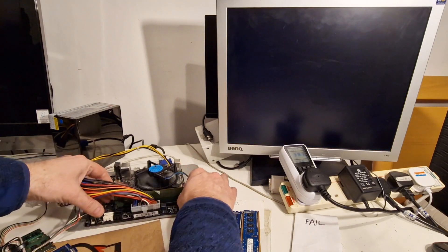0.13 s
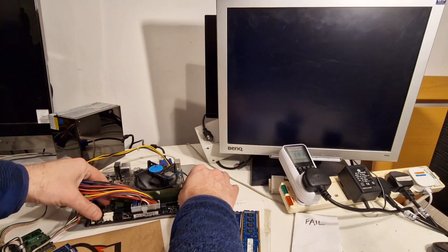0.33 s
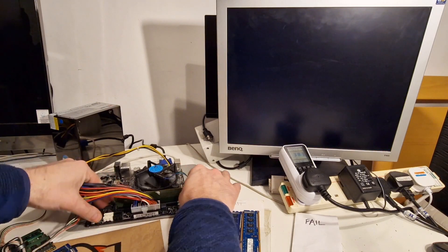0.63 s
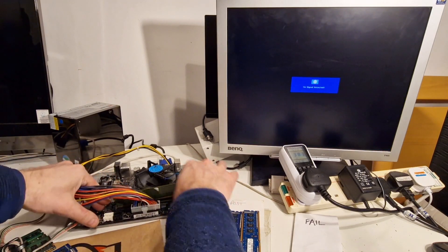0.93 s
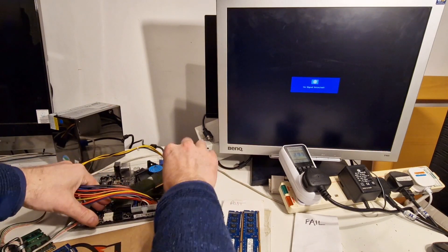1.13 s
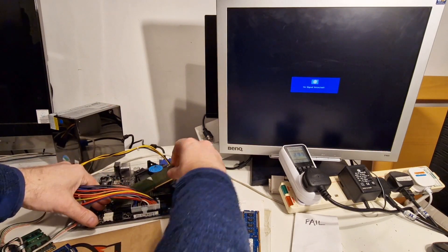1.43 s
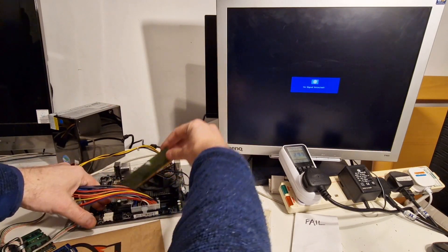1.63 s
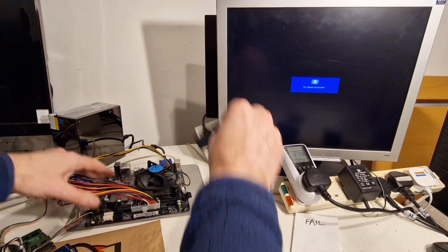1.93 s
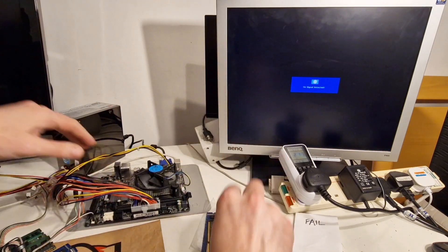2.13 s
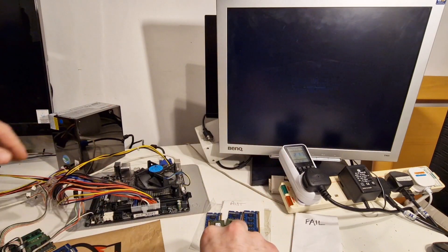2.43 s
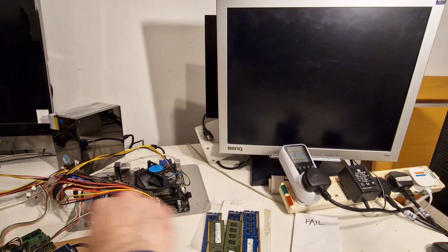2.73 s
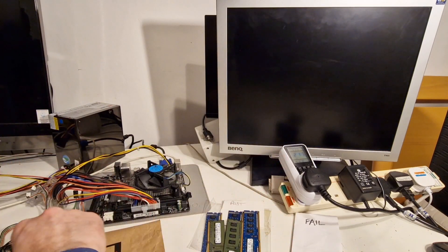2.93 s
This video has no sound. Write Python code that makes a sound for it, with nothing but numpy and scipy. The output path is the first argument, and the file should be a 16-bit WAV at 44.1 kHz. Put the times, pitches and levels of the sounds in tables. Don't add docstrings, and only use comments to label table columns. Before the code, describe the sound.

Sharp plastic snaps and soft knocks as a memory stick is unlatched and dropped on a pile

```python
import sys
import numpy as np
from scipy import signal
from scipy.fft import rfft, irfft
from scipy.io import wavfile

SR = 44100
rng = np.random.default_rng(int(sys.argv[2]) if len(sys.argv) > 2 else 0)


def volts_from_decibels(level):
    exponent = np.asarray(level, float) / 20
    return 10 ** exponent


def master(y):
    cut = np.clip(np.atleast_2d(y).T, -1, 1)
    pcm = np.round(cut * 32767)
    wavfile.write(sys.argv[1], SR, pcm.astype(np.int16))


N = 136710

# (pitch [Hz], level [dB], time to fade by 60 dB [s])
BOARD_TONES = [(273.3, 0.5, 0.082), (356.8, -3, 0.055), (437, 0.5, 0.044), (434, -10, 0.062),
               (662, -26.5, 0.095)]
# (pitch [Hz], level [dB], time to fade by 60 dB [s])
DESK_TONES = [(70, -1.5, 0.054), (125.2, 12.5, 0.081), (145.2, -0.5, 0.23), (176, -12.5, 0.29)]
STICK_T60_S = 0.0018


def ring(force, hz, t60):
    r = volts_from_decibels(-60 / (t60 * SR))
    w = 2 * np.pi * hz / SR
    return signal.lfilter([0, np.sin(w)], [1, -2 * r * np.cos(w), r * r], force + 1e-18)


def strike(force, tones):
    vary_db, detune = 1.5, 0.02
    out = 0
    for k, (hz, db, t60) in enumerate(tones):
        a, b = rng.standard_normal(2)
        sign = (-1) ** k
        out = out + sign * volts_from_decibels(db + vary_db * a) * ring(force, hz * (1 + detune * b), t60)
    return out


def add(out, x, s):
    i = int(s * SR)
    out[i:i + len(x)] += x[:N - i]


def rms_one(x):
    return x / np.sqrt(np.mean(x ** 2) + 1e-20)


def in_time(rows):
    return volts_from_decibels(np.interp(np.arange(N) / SR, *np.transpose(rows)))


def at_hz(points, hz):
    x, y = np.transpose(points)
    return np.interp(np.log(hz), np.log(x), y)


def drift(rate):
    r = np.exp(-80 * np.pi * rate / SR)
    steps = rng.standard_normal(N // 40 + 2002)
    slow = signal.lfilter([1], [1, -2 * r, r * r], steps)[2000:]
    return np.interp(np.arange(N) / 40, np.arange(len(slow)), rms_one(slow))


def knocks():
    # (time [s], board peak [dB], desk thump against board [dB], plastic against board [dB])
    bumps = [(0.152, -42.5, -26, -28), (0.183, -48, -41, -38), (0.237, -47, -25, -31),
             (0.248, -69, 10, -33), (0.346, -43, -37, -21), (0.418, -49, -12.5, -43), (0.655, -37, -7, -30),
             (0.673, -20, -12.5, -9), (0.708, -15.5, -3.5, -9), (0.774, -17.5, -31, -3),
             (0.782, -34.5, -25, 15), (0.789, -33, -11.5, -32), (0.917, -42.5, -9.5, -9),
             (1.022, -50, -48, -4.5), (1.088, -43, -32, 7.5), (1.113, -39, -30, 7.5),
             (1.127, -35, -23, -16), (1.137, -36.5, -27.5, -22), (1.341, -40, -28, -4.5),
             (1.349, -42.5, -42, -41), (1.416, -45.5, -21, -35), (1.462, -54.5, -4.5, 3.5),
             (1.56, -38, -29, 3), (1.637, -46.5, -22, 12.5), (1.919, -50, -18.5, -13),
             (2.198, -46, -6, 7.5), (2.582, -31.5, -9.5, 0.5), (2.589, -26.5, -11, -23),
             (2.629, -36.5, -9.5, -7.5)]
    # (pitch [Hz], level [dB], time to fade by 60 dB [s])
    plastic_tones = [(543, -11, 0.091), (820, -13, 0.011), (1090, -4.5, 0.015), (1290, 2.5, 0.0075),
                     (1328, -2, 0.029), (1630, -3.5, 0.017), (754, -9, 0.022), (1960, 1, .01)]
    contact_hz = 860
    bump_delay_s = 0.002016
    out = np.zeros(N)
    t = np.arange(SR // 3) / SR
    push = t * np.exp(-2 * np.pi * contact_hz * t)
    push = push / push.sum()
    for s, db, desk_db, plastic_db in bumps:
        board = strike(push, BOARD_TONES)
        desk = volts_from_decibels(desk_db) * strike(push, DESK_TONES)
        plastic = volts_from_decibels(plastic_db + 4.5) * strike(push, plastic_tones)
        add(out, volts_from_decibels(db - 3) * (board + desk + plastic), s + bump_delay_s)
    return out


def thin(humps):
    return [(hz, db, STICK_T60_S) for hz, db in humps]


def blur(tones):
    click = np.zeros(SR // 50)
    click[0] = 1
    out = 0
    for k, (hz, db, t60) in enumerate(tones):
        same_energy = np.sqrt(t60 / STICK_T60_S)
        out = out + (-1) ** k * volts_from_decibels(db) * same_energy * ring(click, hz, STICK_T60_S)
    return out


def snaps():
    # (time [s], level [dB], low share against level [dB], top share against level [dB], chatter length [s])
    clicks = [(.151, -51.5, -11, -29, 0.0023), (0.175, -55.5, -5.5, -6, 0.0048),
              (0.42, -45, -9, -18, 0.0037), (.432, -61, -1.5, -18, 0.009), (0.644, -54, -1, -8, 0.029),
              (0.67, -41.5, 1, -0.5, 0.0017), (0.7063, -28.5, -6, 1.5, 0.0037),
              (0.729, -55.5, 18.5, -6, 0.006), (0.777, -38, 12, -18, 0.0016), (0.784, -45, 13, -14.5, .001),
              (0.789, -54.5, 10.5, -12, 0.0023), (0.795, -56, 15, -11, .004), (.806, -55, 9.5, -15.5, .008),
              (0.919, -52, 0, -9, 0.0016), (1.0848, -38, 1.5, 1.5, 0.0024), (1.099, -56, 7.5, -8.5, 0.0068),
              (1.115, -54.5, 6, -20, 0.0063), (1.121, -56.5, 15.5, -11.5, 0.0069),
              (1.336, -47, -4.5, -3, 0.0032), (1.414, -62.5, 2.5, -17, 0.012),
              (1.635, -69.5, 23.5, -29, 0.0026), (1.666, -48.5, -7, -37, 0.006),
              (1.807, -67, 5.5, -20, 0.0072), (1.928, -62.5, -8, -16, 0.0048),
              (2.1954, -30.5, -5, -1, 0.0025), (2.353, -47.5, -15.5, -7.5, 0.0037),
              (2.521, -54.5, -8, -12, 0.0053), (2.5759, -22.5, -5, 0.5, 0.0034),
              (2.5813, -10.5, -6, 1.5, 0.0015), (2.595, -26.5, -12, 0.5, 0.003),
              (2.606, -27, -8, 0.5, 0.0066), (2.626, -18, -13.5, 6, 0.0041), (2.636, -22.5, -14, 0, 0.0027)]
    # (pitch [Hz], level [dB], time to fade by 60 dB [s])
    low_tones = [(1200, -2.5, 0.0068), (1696, -2.5, 0.007), (2061, 6.5, 0.0066), (2258, 5.5, .01),
                 (2520, -1.5, 0.0062), (2830, -6.5, 0.017), (3494, -4, 0.0041)]
    # (pitch [Hz], level [dB])
    mid_humps = [(3700, 2.5), (4500, 7), (5300, 6.5), (6200, 6.5), (7400, 6.5), (8500, 3.5), (9600, -5)]
    # (pitch [Hz], level [dB])
    top_humps = [(10800, -0.41), (11800, 1), (12900, 1), (14000, -3.5), (15100, 0.36)]
    chatter_per_s, chatter_spread_db = 7000, 3
    rise_share = 0.96
    mid_tones, top_tones = thin(mid_humps), thin(top_humps)
    low_blur, mid_blur, top_blur = blur(low_tones), blur(mid_tones), blur(top_tones)
    out, spread = np.zeros(N), np.zeros(N)
    t = np.arange(SR // 8) / SR
    for s, db, low_db, top_db, length in clicks:
        length = max(length, 0.0005)
        swell = 1 - np.exp(-(t + 1 / SR) / (rise_share * length))
        shape = swell * np.exp(-t / length)
        hit = rng.random((3, len(t))) < chatter_per_s / SR
        size = rng.standard_normal((3, len(t)))
        force = hit * np.sign(size) * volts_from_decibels(chatter_spread_db * size) * shape
        force = force / np.sqrt(np.sum(force ** 2, axis=1, keepdims=True) + 1e-12)
        mid, low, top = force * np.sqrt(length / 0.00087)
        direct = strike(mid, mid_tones)
        direct = direct + volts_from_decibels(low_db) * strike(low, low_tones)
        direct = direct + volts_from_decibels(top_db) * strike(top, top_tones)
        add(out, volts_from_decibels(db) * direct, s)
        to_walls = mid_blur + volts_from_decibels(low_db) * low_blur + volts_from_decibels(top_db) * top_blur
        add(spread, volts_from_decibels(db) * np.sqrt(length / 0.00072) * to_walls, s + length)
    return out, spread


def parts():
    # (time [s], peak level [dB], pitch [Hz], time to fade by 60 dB [s])
    pings = [(0.151, -54, 1390, 0.047), (0.184, -46, 2600, 0.066), (0.423, -51, 4200, 0.012),
             (.676, -40, 1380, 0.043), (0.718, -28.5, 2520, 0.046), (0.776, -23, 1370, 0.038),
             (0.799, -36.5, 1452, 0.015), (1.087, -38.5, 560, 0.12), (1.087, -51, 2870, .03),
             (1.113, -46, 523, .06), (1.339, -42, 1200, 0.032), (1.342, -50, 4170, 0.037),
             (1.637, -64, 3020, 0.012), (2.524, -47, 3140, 0.024), (2.583, -7, 2100, 0.024),
             (2.584, -22.5, 1270, 0.027), (2.629, -24.5, 7280, 0.038), (2.63, -16, 6300, 0.046)]
    out = np.zeros(N)
    t = np.arange(SR // 5) / SR
    swell = 1 - np.exp(-t / 0.001)
    for s, db, hz, t60 in pings:
        fade = volts_from_decibels(db - 60 * t / t60)
        add(out, fade * swell * np.sin(2 * np.pi * hz * t), s)
    return out


def shuffle():
    # (time [s], level [dB])
    pressing = [
        (0, -56),
        (.25, -63),
        (.45, -61),
        (.6, -72),
        (.95, -63),
        (1.25, -68.5),
        (1.5, -55.5),
        (1.9, -61),
        (2.1, -81.5),
        (3.1, -84),
    ]
    lumps = rng.standard_normal(N) * volts_from_decibels(1.9 * drift(7.4))
    force = signal.lfilter([0.1], [1, -0.9], lumps)
    board = rms_one(strike(force, BOARD_TONES[:3]))
    desk = rms_one(strike(force, DESK_TONES))
    return in_time(pressing) * volts_from_decibels(-8.5) * rms_one(board + 0.26 * desk)


def rustle():
    # (time [s], level [dB])
    rustle_level = [(0, -73.5), (.1, -63), (.25, -66), (.5, -72.5), (.62, -73), (.95, -67.5), (1.05, -79.5),
                    (1.3, -78.5), (1.45, -65.5), (1.6, -66), (1.82, -63), (1.92, -72.5), (2.1, -78.5),
                    (2.5, -69), (2.85, -62), (3.0, -71), (3.1, -81)]
    # (pitch [Hz], width [Hz], level [dB])
    resonances = [(2210, 75, -2.5), (2900, 300, -13.5), (4200, 780, -3.5), (4900, 2600, -8.5), (6200, 270, -9.5),
                  (7800, 530, 1), (9400, 470, -6)]
    grains = rng.standard_normal((2, N)) * volts_from_decibels(2.0 * rng.standard_normal((2, N)))
    airy = 0
    for hz, width, db in resonances:
        flicker = volts_from_decibels(db + 2.0 * drift(8))
        airy = airy + flicker * rms_one(ring(grains, hz, 2 / width)) * np.sqrt(width)
    airy_band = signal.butter(4, [1750, 8800], "band", fs=SR, output="sos")
    airy = rms_one(signal.sosfilt(airy_band, airy))
    fizz_band = signal.butter(2, 10500, "high", fs=SR, output="sos")
    fizz = rms_one(signal.sosfilt(fizz_band, grains))
    return in_time(rustle_level) * (airy + volts_from_decibels(-13) * fizz)


def floor():
    # (pitch [Hz], level [dB])
    colour = [(15, -10), (25, 5), (161, -9), (344, -7.5), (463, -17), (560, -16), (3080, -42), (16000, -39)]
    # (pitch [Hz], likeness [0 to 1])
    likeness = [(60, 0.44), (240, 0.39), (950, 0.31), (3770, 0.89), (15000, 0.91)]
    edges = 22 * 2 ** np.arange(0, 9.9, 0.5)
    white = rng.standard_normal((2, 2, N))
    out = 0
    for k, (low, high) in enumerate(zip(edges, edges[1:])):
        band = signal.butter(2, [low, high], "band", fs=SR, output="sos")
        mid, side = signal.sosfilt(band, white[k % 2])
        hz = np.sqrt(low * high)
        alike = np.clip(at_hz(likeness, hz), 0, 1)
        pair = np.sqrt(1 + alike) * mid + np.sqrt(1 - alike) * side * [[1], [-1]]
        out = out + volts_from_decibels(at_hz(colour, hz)) * pair
    return volts_from_decibels(-68.5) * rms_one(out)


def place(x):
    move_s = 2.0
    lag_s = -0.00017
    board_pan_db, pile_pan_db = 1.6, 0.3
    top_turn = 1.8
    hz = np.arange(N // 2 + 1) * SR / N
    turn = top_turn * np.tanh(2 * np.pi * hz * lag_s / top_turn)
    late = np.arange(N) > move_s * SR
    out = 0
    for part, pan_db in ((x * ~late, board_pan_db), (x * late, pile_pan_db)):
        spectrum = rfft(part)
        ports = [volts_from_decibels(pan_db * side / 2) * irfft(spectrum * np.exp(-0.5j * side * turn), N)
                 for side in (1, -1)]
        out = out + np.array(ports)
    return out


def room(x):
    t60_s, top_t60_s, split_hz = 0.26, 0.085, 5100
    gap_s, bass_cut_hz = 0.0026, 590
    t = np.arange(SR // 2) / SR
    noise = rng.standard_normal((2, len(t)))
    low = signal.sosfilt(signal.butter(1, split_hz, fs=SR, output="sos"), noise)
    tail = low * volts_from_decibels(-60 * t / t60_s) + (noise - low) * volts_from_decibels(-60 * t / top_t60_s)
    tail = tail * (1 - np.exp(-(t / gap_s) ** 2))
    tail = tail / np.sqrt(np.sum(tail ** 2) / 2)
    tail = signal.sosfilt(signal.butter(2, bass_cut_hz, "high", fs=SR, output="sos"), tail)
    return signal.fftconvolve(tail, x[None])[:, :N]


def scene():
    body = knocks() + shuffle()
    pings = parts()
    edges, spread = snaps()
    direct = place(body + pings + edges)
    echoes = volts_from_decibels(-1) * room(body + volts_from_decibels(-10) * pings + spread)
    return direct + echoes + rustle() + floor()


def band_limit(x):
    return signal.sosfilt(signal.butter(12, 16820, fs=SR, output="sos"), x)


def record(dry):
    low_cut = signal.butter(3, 51.5, "high", fs=SR, output="sos")
    top_cut = signal.cheby2(12, 60, 16800, fs=SR, output="sos")
    mix = signal.sosfilt(top_cut, signal.sosfilt(low_cut, dry))
    return band_limit(mix)


dry = scene()
out = record(dry)
master(out)
```